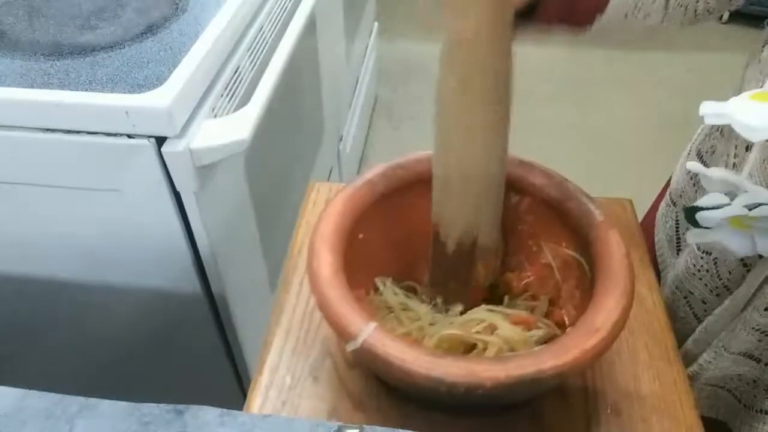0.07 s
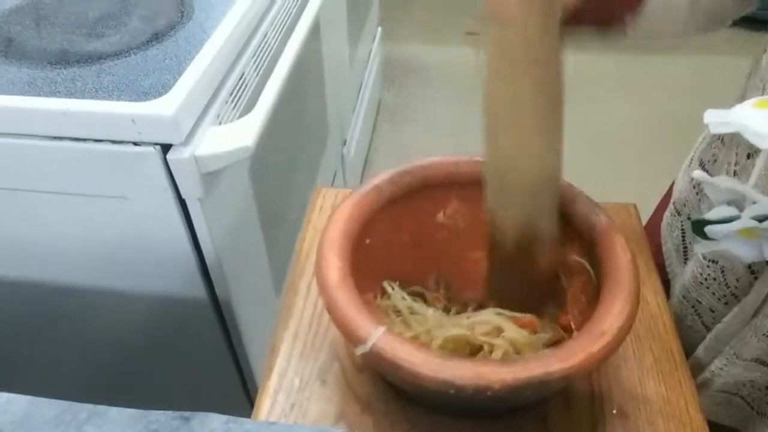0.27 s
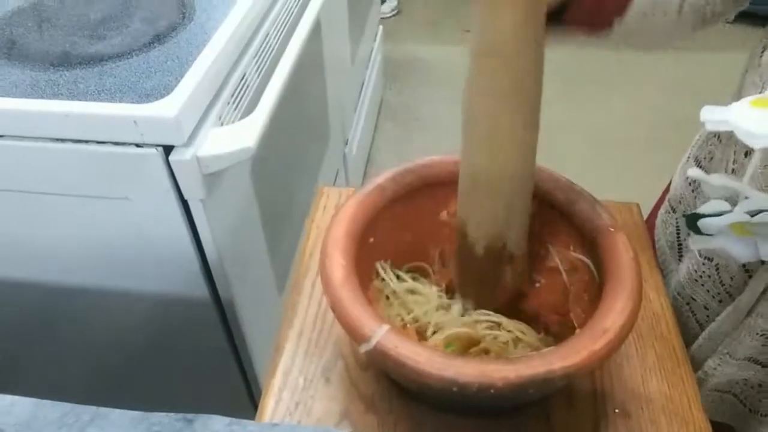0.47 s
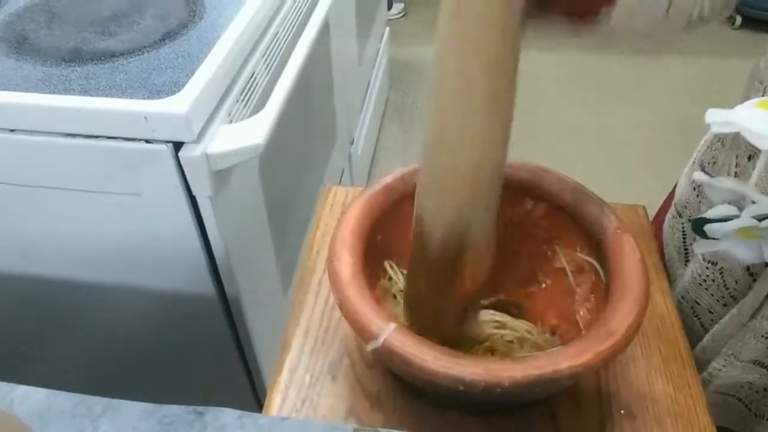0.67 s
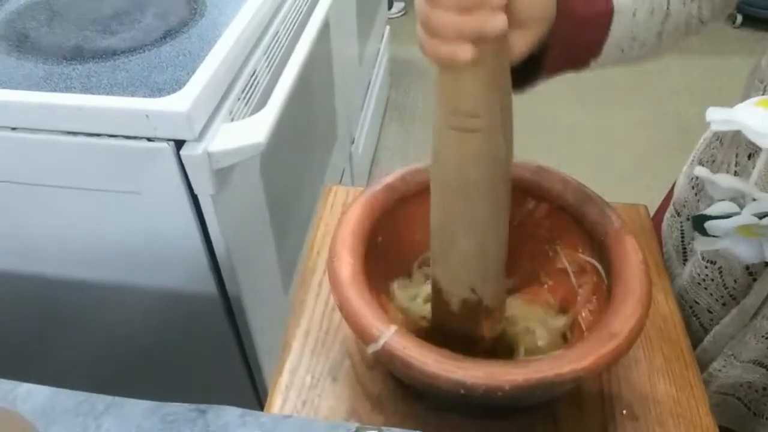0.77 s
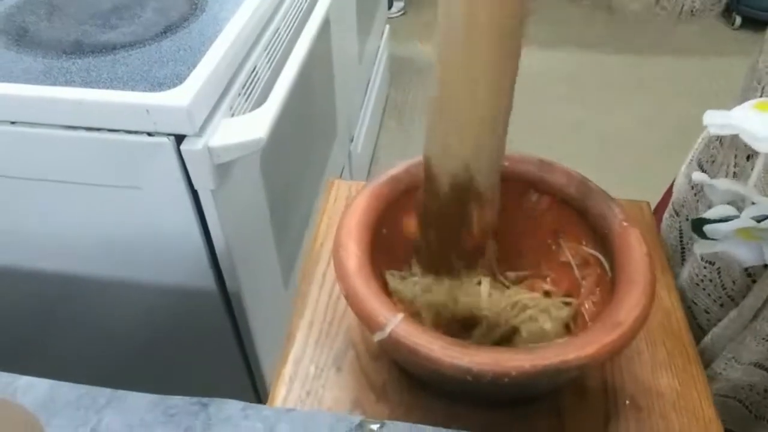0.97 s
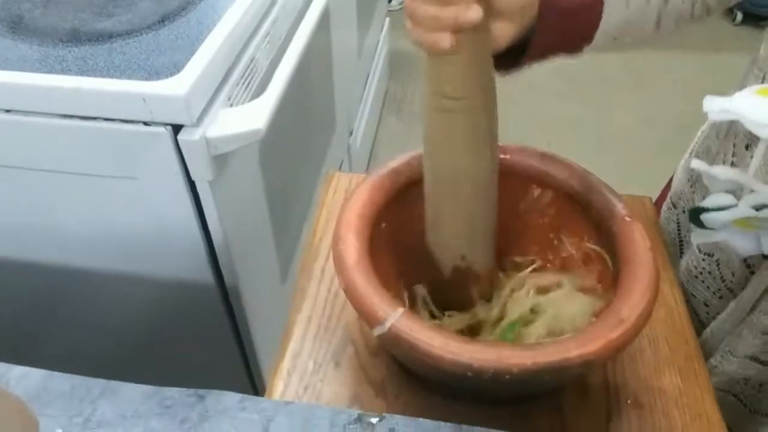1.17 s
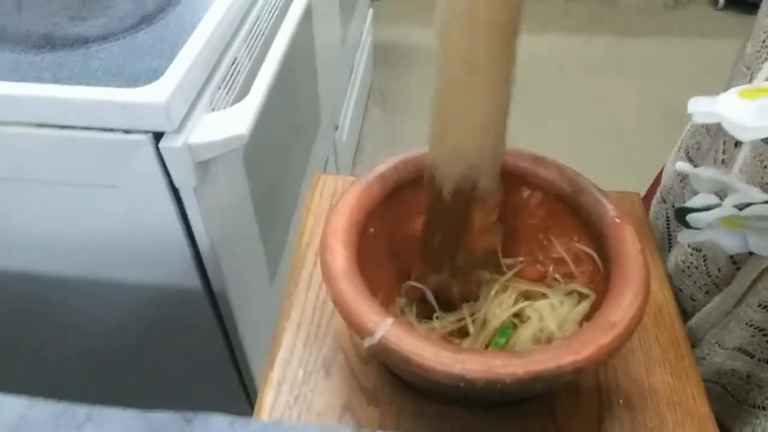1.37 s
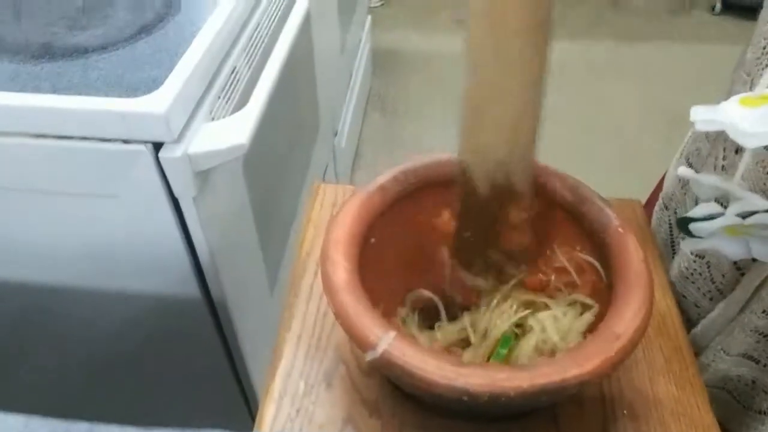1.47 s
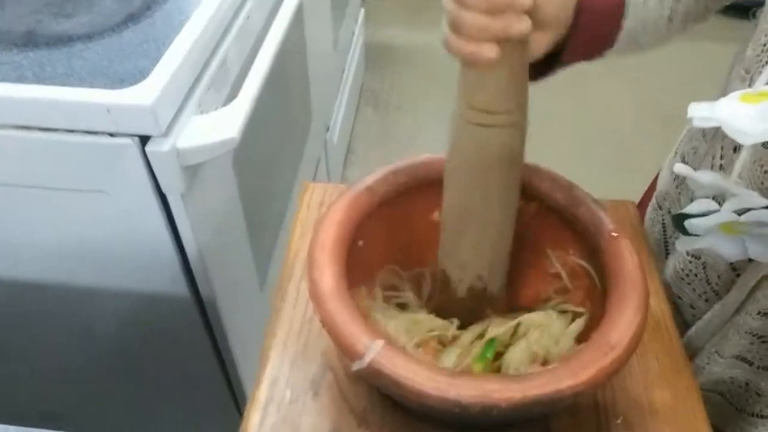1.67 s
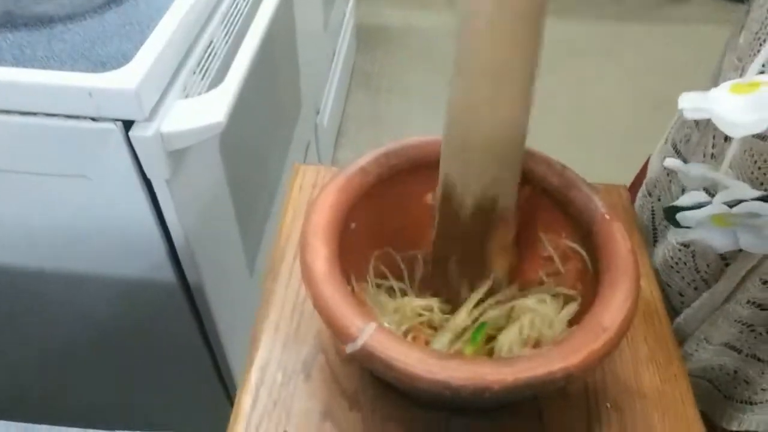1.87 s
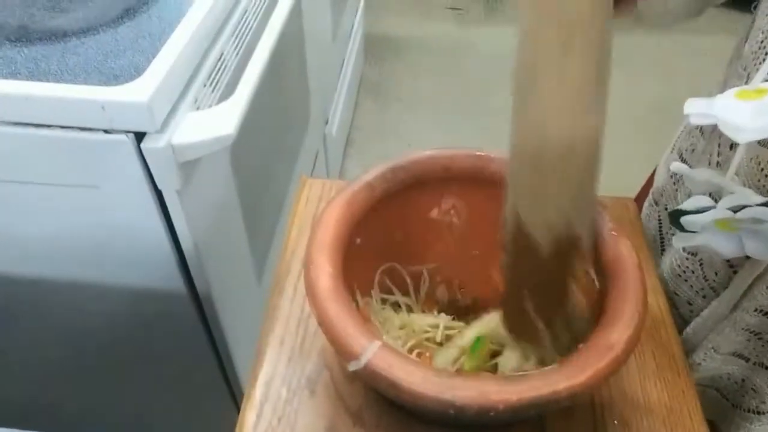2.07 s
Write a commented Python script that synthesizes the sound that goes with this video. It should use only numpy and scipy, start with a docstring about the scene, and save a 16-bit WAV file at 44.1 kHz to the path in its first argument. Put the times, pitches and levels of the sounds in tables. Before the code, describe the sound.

Pestle thudding and squelching in a clay mortar, the last two blows knocking harder.

```python
"""Pounding papaya in a clay mortar

A wooden pestle pounds shredded papaya in a clay mortar on a wooden stool, in a kitchen.
Cushioned blows thud and squelch; hard ones knock through to the clay, which rings briefly.
Between blows the pestle bumps about in the shreds, and a hiss hangs after the two hardest."""
import sys
import numpy as np
from scipy import signal
from scipy.fft import rfft, irfft
from scipy.io import wavfile

SR = 44100
rng = np.random.default_rng(int(sys.argv[2]) if len(sys.argv) > 2 else 0)


def store_wav(level_fs):
    """Save 16-bit WAV to argv[1]."""
    pcm = np.round(np.clip(np.atleast_2d(level_fs), -1, 1) * 32767)
    wavfile.write(sys.argv[1], SR, pcm.T.astype(np.int16))


N = 93844

# Tone colours of the room and the hiss. Each row: frequency in Hz, relative level in dB.
ROOM_TONE_EQ = [(20, -16), (60, 1), (100, -3.5), (170, 6.5), (300, 1.5), (600, 1), (1000, -8), (2000, -17),
                (4000, -20), (4850, -38), (4970, -3.5), (5100, -44), (6300, -24), (7800, -18), (10000, -51),
                (13000, -64), (16000, -62)]
HISS_EQ = [(30, -1), (110, -3.5), (180, 11.5), (300, -1), (900, 5.5), (1500, -0.5), (2500, -6.5),
           (4000, -5), (5200, -3.5), (6200, -7), (7900, 1.5), (9000, -10.5), (11000, -19), (13000, -30),
           (15500, -29)]
# The fader ride on the hiss. Each row: time in seconds, level in dB.
HISS_FADER = [(0, -39.5), (.2, -66.5), (.4, -64.5), (.9, -65.5), (1.0, -56), (1.188, -70), (1.238, -47.5),
              (1.35, -41.5), (1.47, -47), (1.55, -50.5), (1.589, -45), (1.66, -46.5), (1.8, -42),
              (1.96, -42), (2.05, -48), (2.13, -56)]
# Pestle blows. Each row: start in seconds, gains in dB for thud, knock, pestle ring and clay ring,
# clay brightness in dB per octave, seconds until the clay ring drops in level.
BLOW_CUES = [(.001, -26, -30, -56, -25.5, 3.5, 0.166), (0.4051, -23.5, -20, -45, -30.5, 3.5, 0.024),
             (.836, -49, -60, -56, -52.5, 14.5, 0.04), (1.2181, -18.5, -5.5, -10, -15, -8, 0.043),
             (1.6728, -19, -2.5, -16, -16, -1, 0.08)]
# Modes of the mortar on its stool, of the wooden pestle, and of the bowl above its main ring.
# Each row: pitch in Hz, relative level in dB, seconds to fall 60 dB.
STOOL_MODES = [(109, -20, 0.2), (242.3, -5.5, 0.069), (317.5, -0.5, 0.036), (553, -1.5, 0.14),
               (854.3, -7, 0.082)]
PESTLE_MODES = [(1175, -7, 0.1), (1260, -6, 0.14), (1352, -7, 0.073), (1880, -9, 0.023), (2530, -26, 0.085)]
UPPER_CLAY_MODES = [(1316, -17, 0.68), (2844, -16, 0.21), (3590, -20, 0.12)]
MAIN_CLAY_MODE = (1056, 0, .62)
# Tone colours of wood meeting clay, bright spitting juice and duller crunching pulp.
# Each row: frequency in Hz, relative level in dB.
KNOCK_EQ = [(30, -49), (90, -7), (150, -1), (260, 21), (700, 16.5), (1000, 11), (1400, 19), (2000, 8),
            (3000, -22.5), (5000, -1), (16000, -29)]
SPIT_EQ = [(300, -35), (2000, -15), (3500, -8), (5500, -6), (7000, -2), (8100, 2), (9200, -10),
           (11000, -20), (13000, -26), (16000, -30)]
PULP_EQ = [(100, -39), (400, 5), (1000, -2.5), (1900, 0.5), (3300, -9), (5000, -27.5), (9000, -36),
           (16000, -37)]
# Crushed shreds. Each row: start in seconds, spit gain in dB, pulp gain in dB, decay in seconds.
SQUELCH_CUES = [(0.01, -14.5, -9.5, 0.0086), (0.017, -16.5, -20, 0.0071), (.035, -37, -18, 0.02),
                (0.12, -25, -18, 0.009), (0.146, -24.5, -20, 0.0011), (0.157, -30, -25, 0.0013),
                (.399, -26, -50, 0.0011), (0.4028, -13.5, -23, 0.0015), (0.4205, -23, -15.5, 0.0031),
                (0.44, -23, -24, 0.0084), (0.4596, -27, -27, .002), (0.4689, -28, -20, 0.013),
                (0.5146, -40, -23.5, 0.00051), (.803, -39, -66, 0.0012), (0.831, -27.5, -28, 0.0043),
                (0.8351, -15.5, -20.5, 0.005), (.864, -27, -29, .006), (.9335, -54, -27, 0.006),
                (0.946, -37, -32, .005), (1.2183, -8.5, -6.5, 0.0019), (1.2555, -23, -21, 0.0025),
                (1.673, -10, -4, 0.0014), (1.6874, -17, -21, 0.0026), (1.726, -17.5, -22, 0.00072),
                (1.744, -28, -17.5, 0.0018)]
# Soft bumps in the shreds. Each row: start in seconds, gain in dB, centre frequency in Hz.
BUMP_CUES = [(.035, -16.5, 233), (.155, -17.5, 221), (0.232, -21.5, 260), (0.272, -18.5, 260),
             (.272, -19, 574), (.345, -24.5, 450), (.484, -22, 700), (.492, -13, 452), (.934, -19, 537),
             (0.996, -31, 235), (1.021, -25, 222), (1.317, -15, 178), (1.386, -16.5, 237),
             (1.395, -17.5, 410), (1.575, -32.5, 420), (1.907, -14.5, 398), (1.946, -15, 250)]
# The kitchen's reverb. Each row: frequency in Hz, seconds to fall 60 dB, level in dB.
REVERB_BANDS = [(40, 0.9, 2), (101, 1, 9), (204, 0.96, -3.5), (400, 0.32, -3), (700, 0.71, 0),
                (1040, 0.63, 0), (1343, 0.81, 5), (1530, 0.71, -6), (4240, 0.69, -3), (8040, 0.32, -6),
                (15100, 0.45, -21)]


def amp(db):
    """Decibels to gain."""
    return 10 ** (np.asarray(db) / 20)


def unit(x):
    """Scales a sound to energy 1."""
    return x / np.sqrt(np.sum(x ** 2) + 1e-20)


def read(points, hz):
    """Reads a table on a log-frequency axis."""
    f, value = np.transpose(points)
    return np.interp(np.log(hz + 1), np.log(f + 1), value)


def add(mix, start_s, sound):
    """Drops a sound into the mix on its cue."""
    part = mix[max(0, round(start_s * SR)):][:len(sound)]
    part += sound[:len(part)]


def click(eq, size=4096):
    """A minimum-phase click of energy 1 with the given tone colour."""
    log_gain = np.log(amp(read(eq, abs(np.fft.fftfreq(size, 1 / SR)))))
    spectrum = np.exp(np.conj(signal.hilbert(log_gain)))
    return unit(np.fft.ifft(spectrum).real[:size // 2])


def noise(eq):
    """Steady noise of rms 1 with the given tone colour."""
    gain = amp(read(eq, np.fft.rfftfreq(N, 1 / SR)))
    return np.sqrt(N) * unit(irfft(rfft(rng.standard_normal(N)) * gain, N))


def burst(t, rise_s, decay_s):
    """A puff of noise of energy 1 that rises and dies away."""
    envelope = (1 - np.exp(-t / rise_s)) * np.exp(-t / decay_s)
    return unit(rng.standard_normal(len(t)) * envelope)


def waver(count, width_hz):
    """A slow random wobble for level and phase, of rms 1."""
    hz = np.fft.fftfreq(count, 1 / SR)
    spectrum = rng.standard_normal(count) + 1j * rng.standard_normal(count)
    wobble = np.fft.ifft(spectrum * np.exp(-(hz / width_hz) ** 2))
    return np.sqrt(count) * unit(wobble)


def room_tone(level_db=-55):
    """A faint, steady bed of low noise with a thin high whine."""
    return amp(level_db) * noise(ROOM_TONE_EQ)


def hiss():
    """A soft hiss that fades at the opening and swells after the two hardest blows."""
    level_db = np.interp(np.arange(N) / SR, *np.transpose(HISS_FADER))
    return amp(level_db) * noise(HISS_EQ)


def struck_body(modes, t):
    """A struck body rings as dying sines, neighbours swinging in opposite directions."""
    return sum((-1) ** k * amp(db - 60 * t / t60) * np.sin(2 * np.pi * hz * t)
               for k, (hz, db, t60) in enumerate(modes))


def knock(t, scatter_db=3):
    """Wood meets clay: one sharp crack with a scatter of close echoes."""
    scatter = amp(scatter_db) * burst(t, rise_s=.0004, decay_s=.018)
    return 2 * signal.fftconvolve((t == 0) + scatter, click(KNOCK_EQ))


def clay_ring(t, tilt_db, clean_s, drop_s=.01, drop_db=-11, flutter=.45):
    """The clay rings cleanly, then drops in level and wavers as it fades."""
    dropped = np.clip((t - clean_s) / drop_s + .5, 0, 1)
    out = np.zeros(len(t))
    for hz, db, t60 in [MAIN_CLAY_MODE, *UPPER_CLAY_MODES]:
        wobble = 1 + flutter * dropped * waver(len(t), width_hz=16)
        swing = np.exp(2j * np.pi * hz * t) * wobble
        brightness_db = tilt_db * np.log2(hz / MAIN_CLAY_MODE[0])
        out += amp(db + brightness_db - 60 * t / t60) * swing.imag
    return amp(drop_db * dropped) * out


def blows():
    """Each blow thumps the mortar on its stool, knocks on the clay and rings both pestle and bowl."""
    thud, wood, clay = np.zeros((3, N))
    t = np.arange(SR) / SR
    for start_s, thud_db, knock_db, pestle_db, clay_db, tilt_db, clean_s in BLOW_CUES:
        add(thud, start_s, amp(thud_db) * struck_body(STOOL_MODES, t))
        add(wood, start_s, amp(knock_db) * knock(t))
        add(wood, start_s, amp(pestle_db) * struck_body(PESTLE_MODES, t))
        add(clay, start_s, amp(clay_db) * clay_ring(t, tilt_db, clean_s))
    return thud, wood, clay


def squelches(snaps_per_s=12000):
    """Clumps of tiny wet snaps as shreds break and juice spits."""
    out, t = np.zeros(N), np.arange(SR // 10) / SR
    spit, pulp = click(SPIT_EQ), click(PULP_EQ)
    for start_s, spit_db, pulp_db, decay_s in SQUELCH_CUES:
        for colour, db in ((spit, spit_db), (pulp, pulp_db)):
            snaps = burst(t, rise_s=.0014, decay_s=decay_s)
            snaps *= rng.random(len(t)) < snaps_per_s / SR
            add(out, start_s, 2 * amp(db) * unit(signal.fftconvolve(snaps, colour)))
    return out


def bumps(push=.4, skirt_db_per_octave=16.5, rounding_octaves=.17):
    """The pestle nudges the heap: a dull, cushioned push with a short rub."""
    out, t = np.zeros(N), np.arange(SR // 10) / SR
    hz = np.geomspace(20, SR / 2, num=64)
    for start_s, db, centre_hz in BUMP_CUES:
        peak_db = -skirt_db_per_octave * np.hypot(np.log2(hz / centre_hz), rounding_octaves)
        contact = push * (t == 0) + burst(t, rise_s=.0033, decay_s=.01)
        bump = signal.fftconvolve(contact, click(np.c_[hz, peak_db]))
        add(out, start_s, 2 * amp(db) * unit(bump))
    return out


def kitchen_reverb(send, build_s=.0027):
    """A diffuse tail that builds up quickly, each band dying at its own speed."""
    bands = np.array(REVERB_BANDS)
    hz, t, wash = signal.stft(rng.standard_normal(SR), SR, nperseg=256)
    t60 = read(bands[:, :2], hz)[:, None]
    gain = amp(read(bands[:, ::2], hz))[:, None]
    envelope = amp(-60 * t / t60) * (1 - np.exp(-t / build_s))
    envelope *= gain / np.sqrt(SR * np.mean(envelope ** 2, axis=1, keepdims=True))
    _, tail = signal.istft(wash * envelope, SR)
    return signal.fftconvolve(send, tail)[:N]


def scene():
    """The mono mix: the mortar, direct and through the kitchen, over hiss and room tone."""
    layers = np.array([*blows(), squelches(), bumps()])
    sends = amp([-4.5, -19, -4.5, -1, -4.5])  # thud, wood, clay, squelches, bumps
    reverb = kitchen_reverb(sends @ layers)
    return (layers.sum(axis=0) + reverb + hiss() + room_tone())[None]


def record(dry, low_cut_hz=119, high_cut_hz=15800):
    """The microphone thins the deep bass, and a steep high cut trims the very top."""
    low_cut = signal.butter(3, low_cut_hz, "highpass", fs=SR, output="sos")
    high_cut = signal.firwin(511, high_cut_hz, window=("kaiser", 9), fs=SR)
    return signal.oaconvolve(signal.sosfilt(low_cut, dry), high_cut[None], "same")


dry = scene()
out = record(dry)
store_wav(out)
```